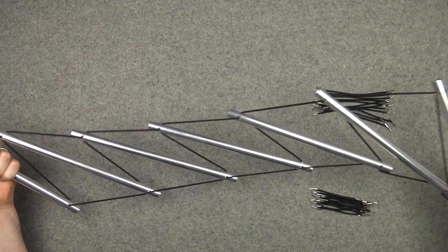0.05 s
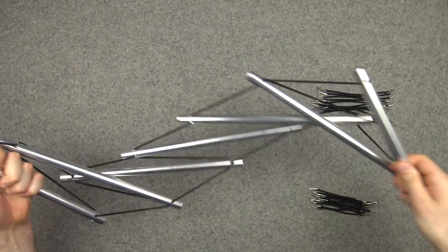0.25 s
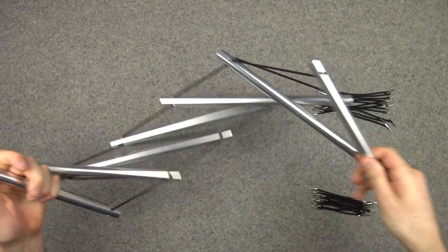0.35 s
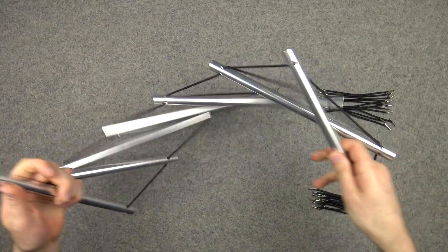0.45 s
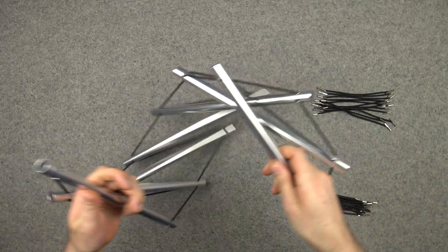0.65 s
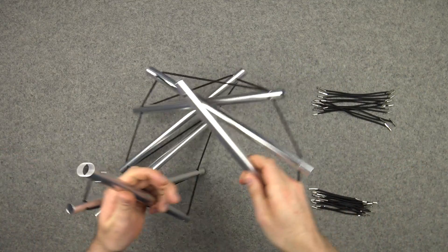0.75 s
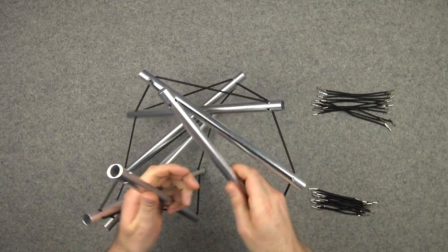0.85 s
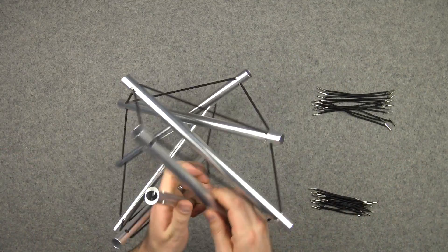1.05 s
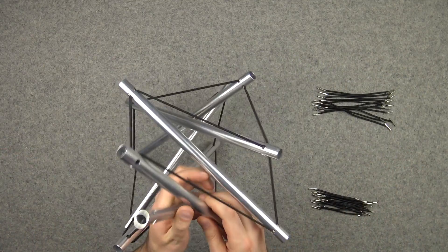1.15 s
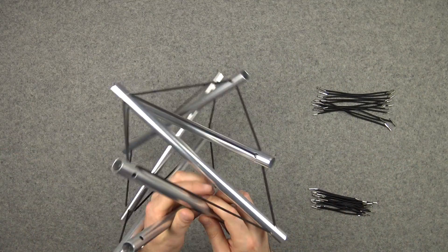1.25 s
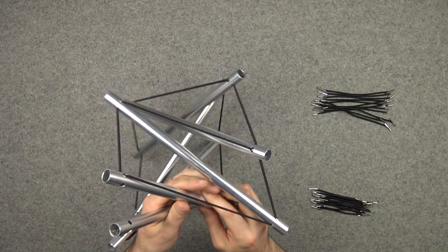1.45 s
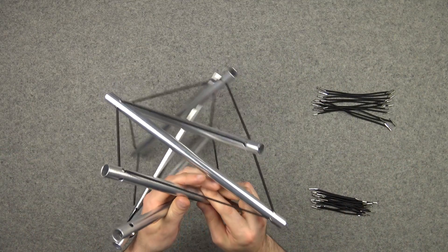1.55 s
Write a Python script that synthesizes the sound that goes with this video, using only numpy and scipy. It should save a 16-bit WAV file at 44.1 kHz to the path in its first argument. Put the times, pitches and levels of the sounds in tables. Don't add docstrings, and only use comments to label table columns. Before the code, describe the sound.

Light hollow metal rods clatter, ring and clatter again more tightly as hands gather them on carpet, with low rustling, a short scrape, a click and very soft final ticks, heard close in a small quiet room.

```python
import sys
import numpy as np
from scipy import signal
from scipy.fft import rfft, irfft
from scipy.io import wavfile
from scipy.ndimage import uniform_filter1d

SR = 44100
rng = np.random.default_rng(int(sys.argv[2]) if len(sys.argv) > 2 else 0)


def undo_db(level):
    steps = np.asarray(level, float) / 20
    return 10 ** steps


def output_pcm(signal):
    pcm = np.clip(np.atleast_2d(signal).T, -1, 1) * 32767
    wavfile.write(sys.argv[1], SR, np.round(pcm).astype(np.int16))


N = 70560


def level(x, db):
    return x * undo_db(db) / np.sqrt(np.mean(x ** 2))


def curve(rows, column=1):
    rows = np.array(rows)
    return undo_db(np.interp(np.arange(N) / SR, rows[:, 0], rows[:, column], left=-150))


def colour(x, points):
    points = np.array(points)
    f = np.arange(len(x) // 2 + 1) * SR / len(x) + 1e-3
    db = np.interp(np.log(f), np.log(points[:, 0]), points[:, 1])
    db = db - 18 * np.maximum(np.log2(points[0, 0] / f), 0)
    return irfft(rfft(x) * undo_db(db), len(x))


def ring(x, hz, t60):
    r = np.exp(-np.log(1000) / (t60 * SR))
    pole = r * np.exp(2j * np.pi * hz / SR)
    return np.sqrt(1 - r * r) * signal.lfilter([1], [1, -pole], x).imag


def walk(rate):
    k = int(SR / rate)
    steps = np.repeat(rng.standard_normal(N // k + 1), k)
    return level(uniform_filter1d(uniform_filter1d(steps, k), k)[:N], 0)


def add(out, at_s, x):
    i = int(at_s * SR)
    out[i:i + len(x)] += x[:max(N - i, 0)]


# frequency in Hz, density in dB per Hz.
FLOOR = [(15, -75), (25, -55.5), (94, -6), (290, -20), (323, -5.5), (434, -16), (584, -7), (668, -20),
         (15600, -48)]


def room_hum():
    return level(colour(rng.standard_normal(N), FLOOR), -66.5)


# time in seconds, level in dB.
HANDS = [(0, -64), (.37, -74), (.4, -49.5), (.47, -45), (.6, -46.5), (.645, -64), (.8, -48.5), (.93, -53),
         (1.0, -51.5), (1.13, -51.5), (1.3, -52.5), (1.5, -54.5), (1.53, -55)]
# frequency in Hz, width in Hz, level in dB.
HANDS_COLOUR = [(350, 70, 0), (250, 120, -8), (505, 45, -9), (800, 600, -11)]


def hand_rustle():
    rustle = np.zeros(N)
    for hz, width_hz, db in HANDS_COLOUR:
        flicker_db = 3 * walk(25)
        t60 = 1.6 / width_hz
        band = ring(ring(rng.standard_normal(N), hz, t60), hz, t60)
        rustle += undo_db(db + flicker_db) * level(band, 0)
    rustle = signal.sosfilt(signal.butter(2, 140, "high", fs=SR, output="sos"), rustle)
    return level(rustle, -4) * curve(HANDS)


SLIDE_RING, SLIDE_GRAINS_PER_S, SLIDE_GRAIN_DB = 0.13, 3500, 3


def grains():
    chance, spread = rng.random((2, N))
    size = undo_db(np.minimum(-SLIDE_GRAIN_DB * np.log(spread), 9))
    slips = (chance < SLIDE_GRAINS_PER_S / SR) * size
    return level((slips + 0.5) * rng.standard_normal(N), 0)


# frequency in Hz, level in dB, decay t60 in seconds.
TUBE = [(1017, -16.5, 0.48), (2715, -11.5, 0.55), (5089, 2, 0.18), (7946, -7.5, 0.36), (11670, -12.5, 0.17),
        (11000, -23, .2), (11080, -7, 0.15), (12100, -4, 0.11), (12650, -15.5, 0.19), (13700, -16, .08),
        (13700, -20, 0.068), (14300, -18.5, .05)]
TUNINGS = [.9905, .9955, 1.0, 1.0095, 1.0145, 1.033]
# time in seconds, level in dB, hardness in dB.
RATTLE = [(.135, -96.5, -15), (.2, -75, 4.5), (.222, -44, -2), (.237, -27.5, 1.5), (.252, -38.5, 5.5),
          (.33, -32.5, -0.5), (.366, -36.5, 1.5), (.38, -34.5, 3.5), (.44, -38.5, -2), (.55, -56.5, -20.5),
          (.6, -57, -10), (.65, -34, -5.5), (.73, -33.5, -18), (.86, -62.5, -16), (.94, -94, -22),
          (.97, -99, -21.5)]
# frequency in Hz, density in dB per Hz.
RATTLE_COLOUR = [(900, -11.5), (1300, -10), (3000, -2), (4200, -7.5), (6200, -6), (9600, -27.5),
                 (12200, -32.5), (15600, -14.5)]
RATTLE_TOP_HZ, RATTLE_TOP_DB, RATTLE_TONE_DB = 8600, -7, -12.5
SKIRT_UP, SKIRT_T60_S, SKIRT_DB = 0.069, 0.042, -11


def rattle():
    rub, effort = grains(), curve(RATTLE)
    hard = effort * curve(RATTLE, column=2)
    hiss = level(colour(rub, RATTLE_COLOUR), 0)
    low = signal.sosfiltfilt(signal.butter(4, RATTLE_TOP_HZ, fs=SR, output="sos"), hiss)
    tone, skirt = np.zeros(N), np.zeros(N)
    for hz, db, t60 in TUBE:
        push = rub * (effort if hz < RATTLE_TOP_HZ else hard)
        for tuning in TUNINGS[1::2]:
            tone += undo_db(db) * ring(push, hz * tuning, SLIDE_RING * t60)
    for hz, db, _ in TUBE[1:4]:
        skirt += undo_db(db) * ring(rub * effort, hz * (1 + SKIRT_UP), SKIRT_T60_S)
    noise = low * effort + undo_db(RATTLE_TOP_DB) * (hiss - low) * hard
    return noise + undo_db(RATTLE_TONE_DB) * tone + undo_db(SKIRT_DB) * skirt


# frequency in Hz, density in dB per Hz.
TICK_COLOUR = [(1000, -5), (2500, -17), (6500, 3), (9500, -1.5), (12500, -19.5), (15800, -14)]
TICK_S = .001
SPLIT = .0015
MODE_SCATTER_DB, KNOCK_DB = 5.5, -11.5


def knocks(rows, share, tick_db, rise_s, tubes_db, wall_db):
    out, ticks, t = np.zeros(N), np.zeros(N), np.arange(SR // 3) / SR
    hz, db, t60 = np.array(TUBE).T[:, :, None]
    tuning, part_db = np.array([TUNINGS, tubes_db])[:, :, None, None]
    decay = undo_db(-60 * t / (share * t60))
    rise = 1 - np.exp(-t / rise_s)
    for s, peak_db, low_db, second_db, high_db in rows:
        detune, scatter = rng.standard_normal((2, len(TUNINGS), len(TUBE), 1))
        wall_modes = [high_db + wall_db] * (len(TUBE) - 5)
        tilt = np.array([low_db, second_db, 0, high_db, high_db] + wall_modes)[:, None]
        gain = undo_db(peak_db + KNOCK_DB + db + tilt + part_db + MODE_SCATTER_DB * scatter)
        waves = gain * np.sin(2 * np.pi * hz * (tuning + SPLIT * detune) * t)
        modes = waves.sum(axis=0) * decay
        add(out, s, modes.sum(axis=0) * rise)
        tick = rng.standard_normal(SR // 50)
        add(ticks, s, undo_db(peak_db + tick_db) * tick * np.exp(-t[:len(tick)] / TICK_S))
    bright = colour(ticks, TICK_COLOUR)
    return out + bright * np.std(ticks) / np.std(bright)


# start in seconds, level in dB, then in dB the lowest mode,
# the second mode, and the fourth and higher modes.
FIRST = [(.2039, -55, 10, 23, -15), (.2133, -43.5, 4, 18.5, -17), (.2188, -24.5, -2.5, 4, -24),
         (.2354, -13, -11, 4, -6), (.2643, -16.5, -4.5, -8, -21), (.2804, -25, -28.5, 12, 10),
         (.2952, -22.5, -22.5, 11.5, -17), (.3024, -18, -24.5, -13, -0.5), (.3114, -13.5, -7.5, 8, -0.5),
         (.3361, -17.5, -3, 8, 0.5), (.3584, -20.5, 3, -17.5, -16), (.3754, -16, -9, 4, 4),
         (.3924, -15, -9.5, 10.5, 3), (.4094, -19, 3, 5.5, -1.5), (.4264, -24, -26, -8.5, 2),
         (.4434, -20, -5.5, 6, -2), (.4784, -25.5, 11, 4, 0), (.535, -41.5, 24, -13, -15.5)]
FIRST_TUBES_DB = [-19, -4.5, -2.5, -2, -8, -8.5]


def first_cluster():
    return knocks(FIRST, share=0.65, tick_db=-13, rise_s=0.0012, tubes_db=FIRST_TUBES_DB, wall_db=-7.5)


# start in seconds, level in dB, frequency in Hz, width in Hz.
SNAPS = [(.2188, -31, 6990, 7970), (0.376, -21, 7600, 7910), (0.393, -11, 7540, 7900),
         (.332, -32, 14270, 3040), (0.361, -19, 13000, 4970), (.6123, -40, 8200, 9100),
         (0.2355, -23, 7050, 8970), (0.263, -28, 13000, 4930), (.282, -15.5, 13720, 4000),
         (0.299, -20, 13960, 2974), (0.317, -24, 13870, 2930), (0.631, -26, 11000, 8960),
         (0.6473, -27, 13700, 5000), (0.662, -26, 14000, 4170), (0.6799, -35, 14000, 4020),
         (1.395, -45, 6100, 3940), (1.411, -62, 5530, 4000), (1.5347, -49, 8700, 4000),
         (1.55, -56, 8500, 4000)]
# frequency in Hz, level in dB.
SNAP_BODY = [(1500, 0), (16000, 0)]
SNAP_S = .0012


def snaps():
    out, t = np.zeros(N), np.arange(SR // 100) / SR
    for s, db, hz, width_hz in SNAPS:
        click = rng.standard_normal(len(t)) * np.exp(-t / SNAP_S)
        t60 = 3 / width_hz
        add(out, s, undo_db(db) * ring(ring(click, hz, t60), hz, t60))
    return colour(out, SNAP_BODY)


# start in seconds, level in dB, frequency in Hz, band ratio, t60 in seconds.
BUMPS = [
    (.4, -42.5, 400, 1.36, 0.81),
    (.478, -32.5, 488, 1.59, 0.18),
    (1.028, -35.5, 850, 1.25, 0.28),
    (1.586, -44.5, 105, 1.17, 0.12),
]


def bumps():
    out, t = np.zeros(N), np.arange(SR // 4) / SR
    for s, db, hz, ratio, t60 in BUMPS:
        ratio = max(ratio, 1.05)
        band = signal.butter(2, [hz / ratio, hz * ratio], "band", fs=SR, output="sos")
        burst = np.exp(-np.log(1000) * t / t60) * rng.standard_normal(len(t))
        add(out, s, level(signal.sosfilt(band, burst), db - 15))
    return out


# time in seconds, level in dB.
SLIDE = [(.575, -99), (.592, -54), (.612, -52.5), (.63, -99), (.93, -99), (.965, -57), (1.0, -42.5),
         (1.045, -40.5), (1.1, -54), (1.15, -100.5), (1.2, -81.5), (1.42, -78.5), (1.445, -64.5),
         (1.5, -78), (1.56, -67.5), (1.575, -55.5), (1.6, -53.5)]
# frequency in Hz, density in dB per Hz.
SLIDE_COLOUR = [(700, 16), (1200, 7.5), (3000, 1.5), (6500, -13.5), (9700, -11.5), (12000, -11.5),
                (14000, -10.5), (15600, -26)]
SLIDE_MODES_DB = [-3, -4.5, -2, 4.5, -8.5, -7, -13, -4.5, -8, -6, -10, -11]
SLIDE_TONE_DB = -8


def slide():
    rub, effort = grains(), curve(SLIDE)
    tone = np.zeros(N)
    for (hz, _, t60), db in zip(TUBE, SLIDE_MODES_DB):
        for detune in (-.014, .001, .012):
            tone += undo_db(db) * ring(rub * effort, hz * (1 + detune), SLIDE_RING * t60)
    return level(colour(rub, SLIDE_COLOUR), 0) * effort + undo_db(SLIDE_TONE_DB) * tone


# start in seconds, level in dB, then in dB the lowest mode,
# the second mode, and the fourth and higher modes.
SECOND = [(.6214, -25.5, -35, 10, 7.5), (.6414, -13.5, -3, 6, -4.5), (.6464, -14, -20, 11, 9),
          (.6636, -17, -18, -23, 8.5), (.6724, -17.5, 9.5, -19, -14.5), (.6879, -17.5, 0.5, 11, 3.5),
          (.6965, -15.5, -27, 2, -18), (.7032, -10, -17, -12, -1.5), (.713, -24.5, 18.5, -21, 11),
          (.733, -16.5, -2.5, -11, -15), (.7634, -20, 10.5, 5.5, 2.5)]
SECOND_TUBES_DB = [-6.5, -10.5, 3, -1.5, -8.5, -6.5]


def second_cluster():
    return knocks(SECOND, share=0.36, tick_db=-22, rise_s=.004, tubes_db=SECOND_TUBES_DB, wall_db=-13.5)


# start in seconds, length in seconds, level in dB, frequency in Hz.
PUFFS = [
    (.765, .16, -58, 33),
    (.82, .09, -62, 503),
    (.92, .22, -72, 34),
    (.94, .11, -61, 507),
    (1.565, .1, -63, 40),
]


def puffs():
    out, t = np.zeros(N), np.arange(SR // 4) / SR
    for s, length, db, hz in PUFFS:
        u = np.clip(t / length, 0, 1) ** .75
        swell = np.sin(np.pi * u) ** 2
        add(out, s, undo_db(db + 6) * swell * np.sin(2 * np.pi * hz * t))
    return out


# start in seconds, level in dB, then in dB the lowest mode,
# the second mode, and the fourth and higher modes.
HELD = [(1.1555, -27, -47, -7, -8.5), (1.516, -60, -21, -22, -5), (1.5335, -46, -32, -21, -16),
        (1.55, -67, -20, -26, -6), (1.5735, -39, -14, 11.5, -16), (1.5915, -37, -20, 1, -13)]
HELD_TUBES_DB = [-20.5, 0, -1.5, -9, -12.5, -14.5]


def held_ticks():
    return knocks(HELD, share=0.24, tick_db=-21.5, rise_s=0.00069, tubes_db=HELD_TUBES_DB, wall_db=10)


# start in seconds, level in dB, then in dB the lowest mode,
# the second mode, and the fourth and higher modes.
TOUCHES = [(1.43, -62, -30.5, 35, 29.5), (1.4445, -53, -19.5, 31.5, 12), (1.4635, -61.5, 1, 15, 25),
           (1.56, -56, -19, 30, -14)]


def soft_touches():
    return knocks(TOUCHES, share=.19, tick_db=-10, rise_s=.006, tubes_db=HELD_TUBES_DB, wall_db=3.9)


# frequency in Hz, level in dB, t60 in seconds.
CLINK_MODES = [(3610, -15.5, 0.13), (5990, -7, .12), (7430, -5.5, 0.077), (8000, -1.5, 0.047),
               (11600, -10.5, 0.052), (13000, -21, 0.089), (13900, -20.5, .07), (14900, -19, 0.073)]
# start in seconds, level in dB, two lowest modes in dB.
CLINKS = [(1.517, -60, -15), (1.5332, -48, -25), (1.55, -54.5, -18), (1.573, -55.5, 1), (1.588, -56.5, 4)]


def clinks():
    out, t = np.zeros(N), np.arange(SR // 4) / SR
    hz, db, t60 = np.array(CLINK_MODES).T[:, :, None]
    lowest = (np.arange(len(hz)) < 2)[:, None]
    for s, peak_db, low_db in CLINKS:
        f = hz * (1 + 0.0067 * rng.standard_normal((2, len(CLINK_MODES), 1)))
        gain = undo_db(peak_db + db + low_db * lowest - 60 * t / t60)
        add(out, s, (gain * np.sin(2 * np.pi * f * t)).sum(axis=(0, 1)))
    return out


REPEAT_S, REPEAT_DB = .0169, -9


def repeats(x):
    lag, out = int(REPEAT_S * SR), x
    for k in (1, 2):
        out = out + undo_db(k * REPEAT_DB) * np.pad(x, (k * lag, 0))[:N]
    return out


ROOM_T60_S, ROOM_TOP_T60_S, ROOM_DB = 0.31, 0.15, -9.5


def room(x):
    t = np.arange(SR // 2) / SR
    noise = rng.standard_normal(len(t))
    low = signal.sosfilt(signal.butter(2, 8500, fs=SR, output="sos"), noise)
    tail = low * undo_db(-60 * t / ROOM_T60_S) + (noise - low) * undo_db(-60 * t / ROOM_TOP_T60_S)
    tail = tail * (1 - np.exp(-t / 0.014))
    tail = tail / np.sqrt(np.sum(tail ** 2))
    return x + undo_db(ROOM_DB) * signal.fftconvolve(x, tail)[:N]


METAL_LOW_HZ = 918


def scene():
    knocking = first_cluster() + second_cluster() + held_ticks() + soft_touches() + clinks()
    metal = knocking + slide() + rattle()
    metal = signal.sosfilt(signal.butter(4, METAL_LOW_HZ, "high", fs=SR, output="sos"), metal)
    hum = room_hum()
    tubes_in_room = room(repeats(metal) + snaps())
    hands = hand_rustle() + bumps() + puffs()
    return (tubes_in_room + hands + hum)[None]


def band_limit(x):
    return signal.sosfilt(signal.butter(12, 15850, fs=SR, output="sos"), x)


def record(dry):
    mix = signal.sosfilt(signal.ellip(8, .2, 60, 15750, fs=SR, output="sos"), dry)
    return band_limit(mix)


dry = scene()
out = record(dry)
output_pcm(out)
```